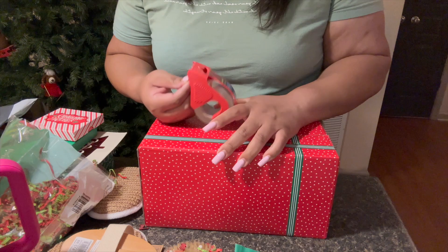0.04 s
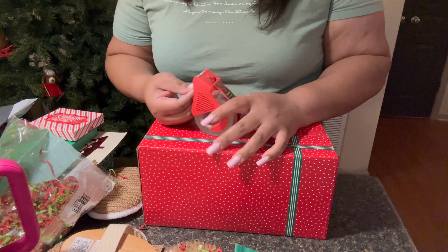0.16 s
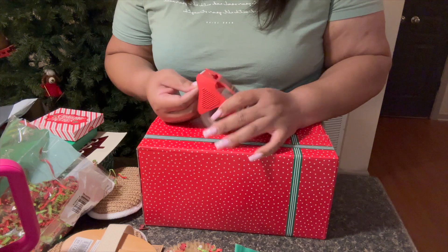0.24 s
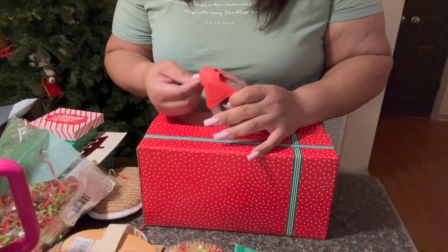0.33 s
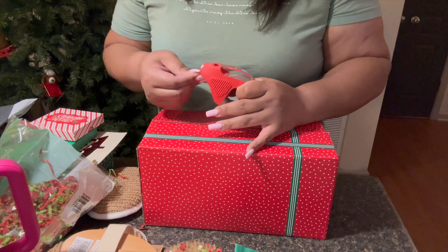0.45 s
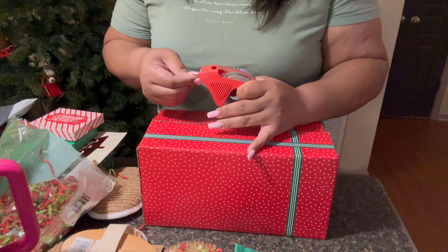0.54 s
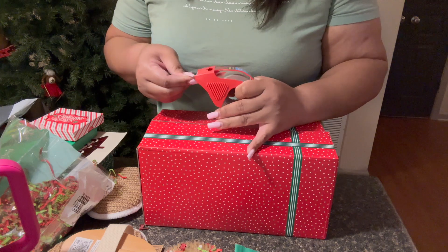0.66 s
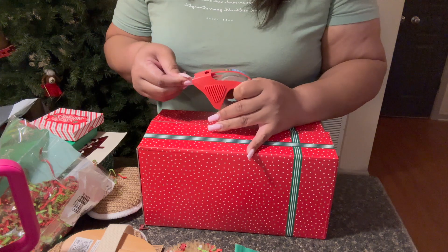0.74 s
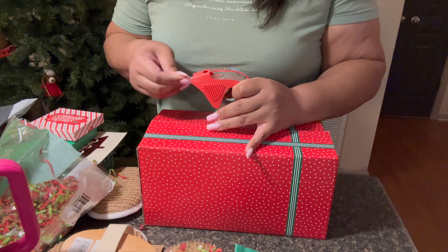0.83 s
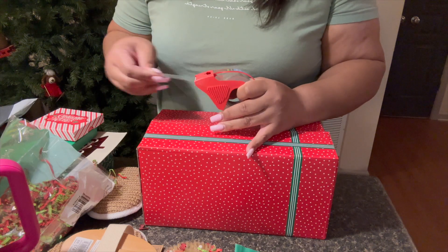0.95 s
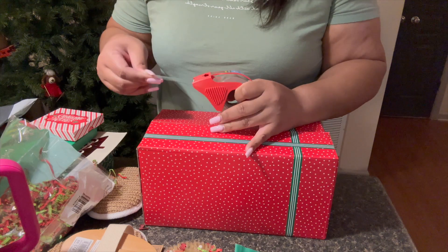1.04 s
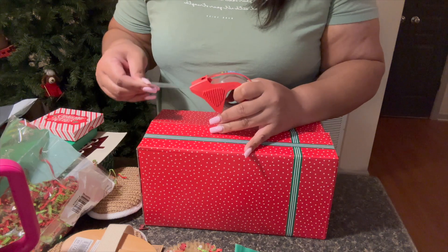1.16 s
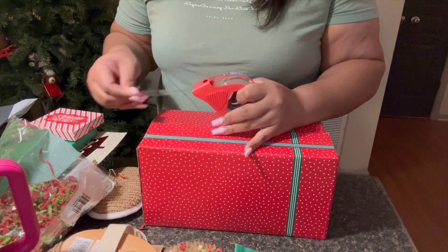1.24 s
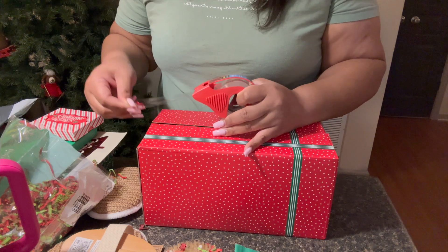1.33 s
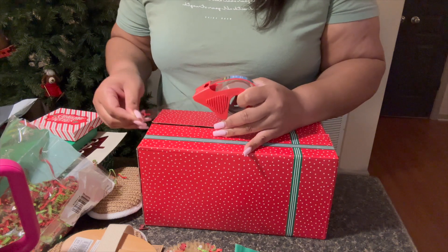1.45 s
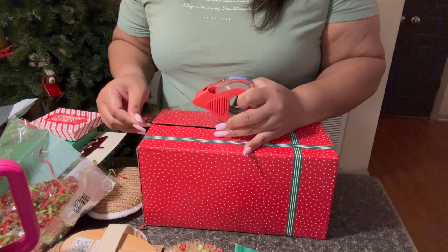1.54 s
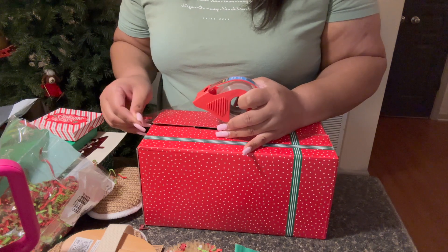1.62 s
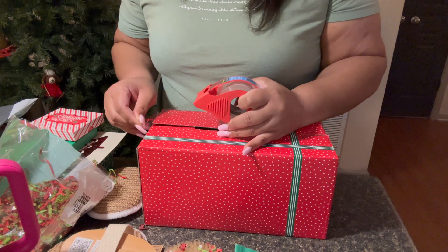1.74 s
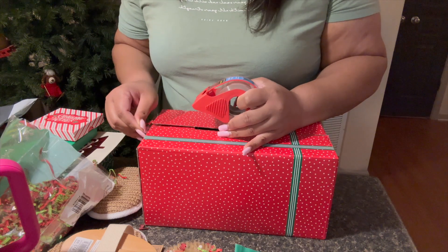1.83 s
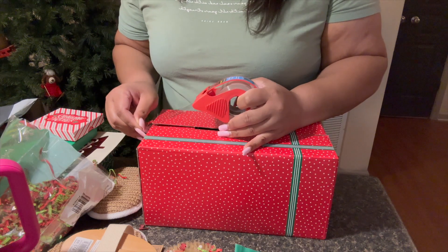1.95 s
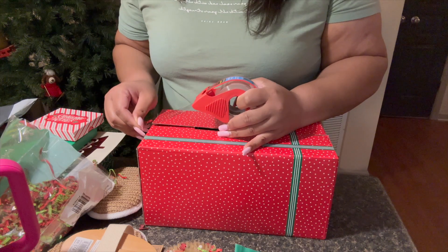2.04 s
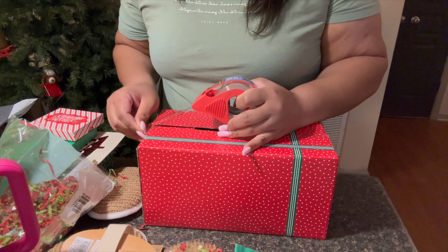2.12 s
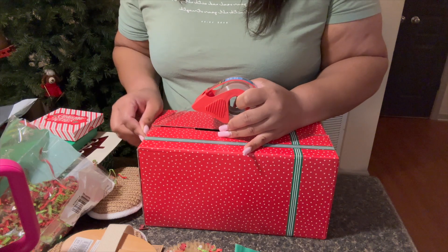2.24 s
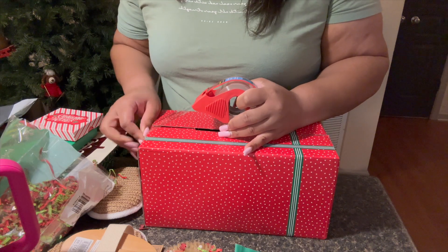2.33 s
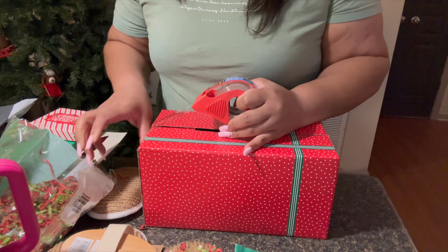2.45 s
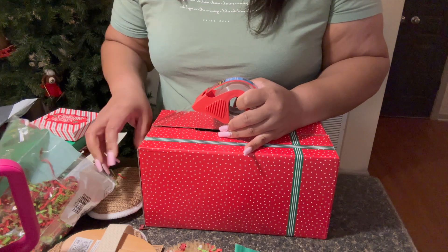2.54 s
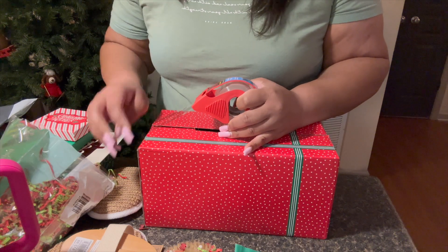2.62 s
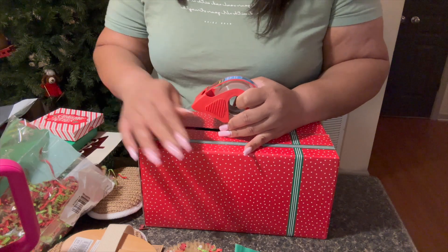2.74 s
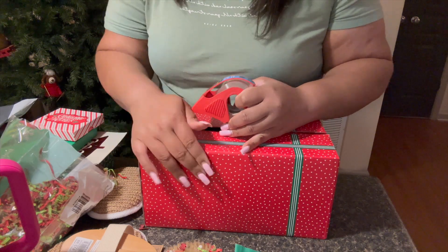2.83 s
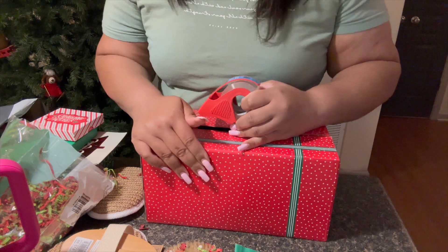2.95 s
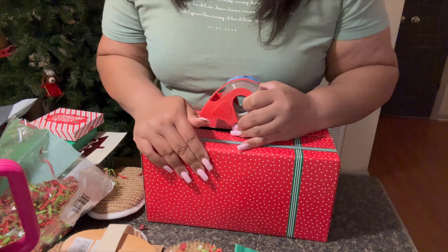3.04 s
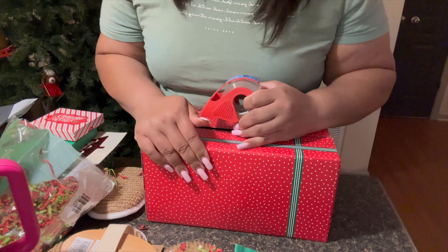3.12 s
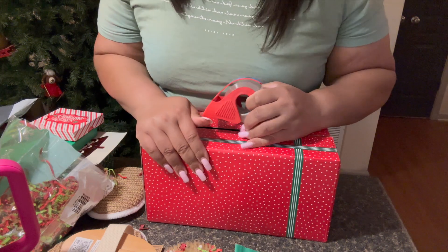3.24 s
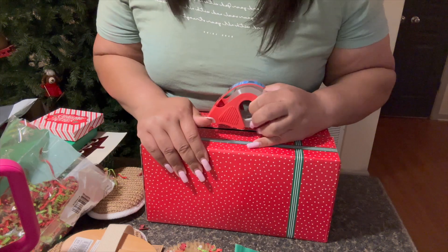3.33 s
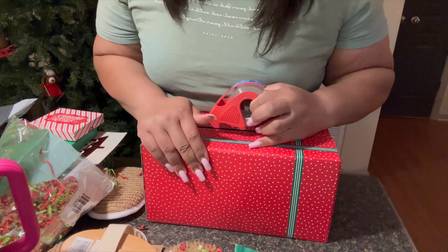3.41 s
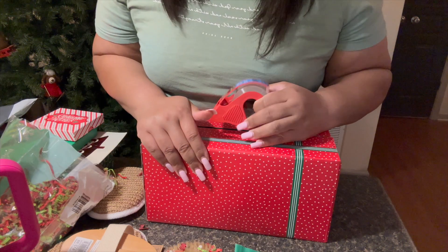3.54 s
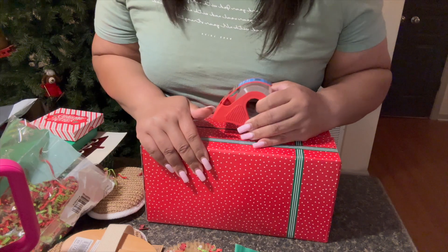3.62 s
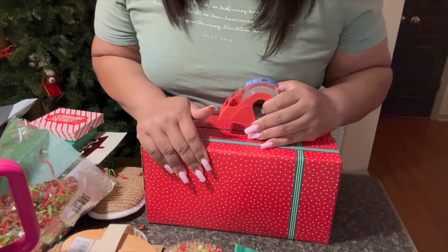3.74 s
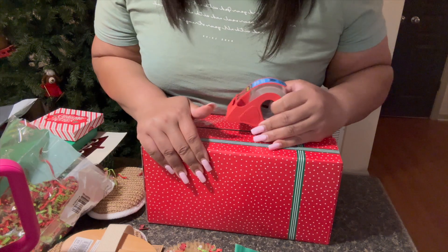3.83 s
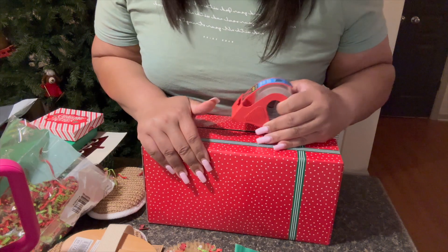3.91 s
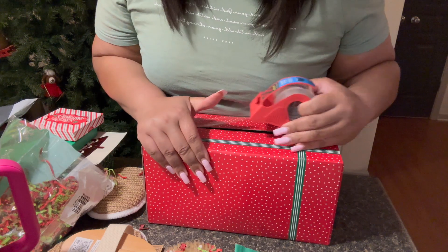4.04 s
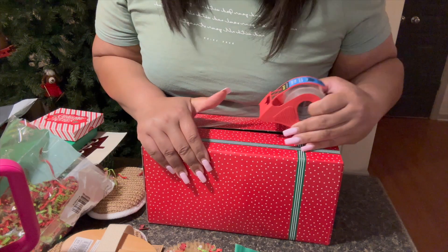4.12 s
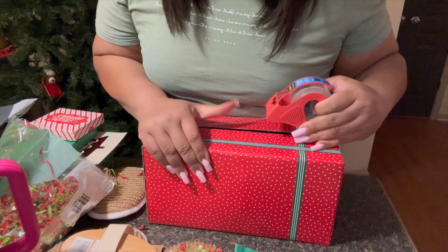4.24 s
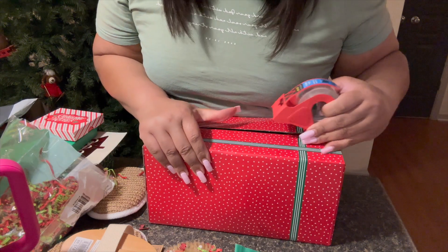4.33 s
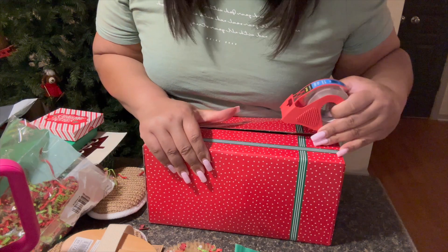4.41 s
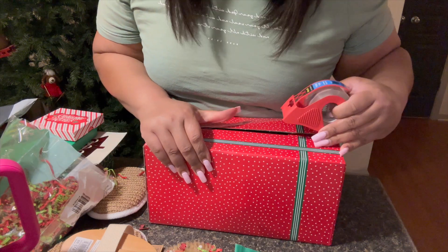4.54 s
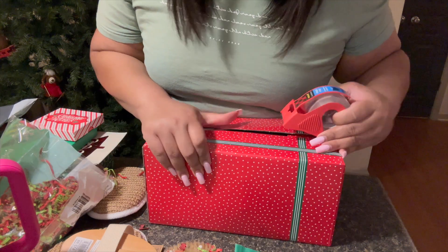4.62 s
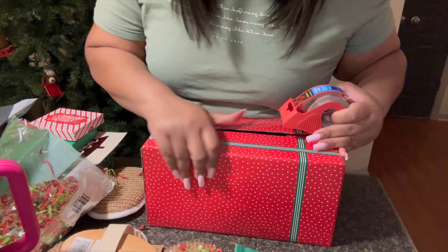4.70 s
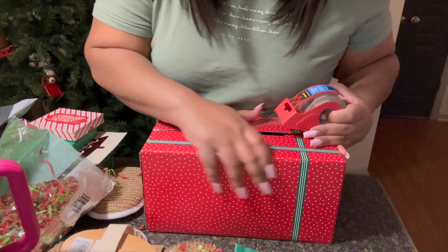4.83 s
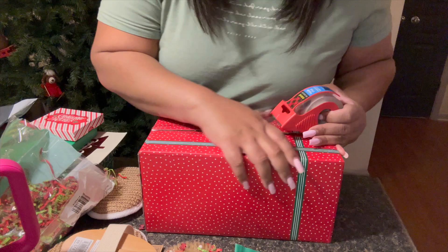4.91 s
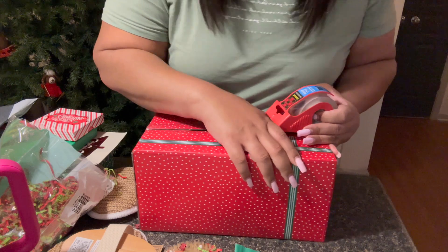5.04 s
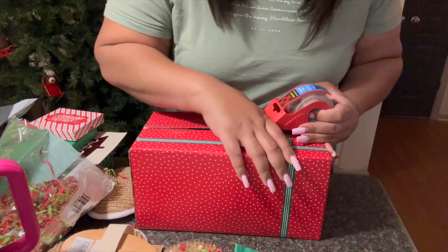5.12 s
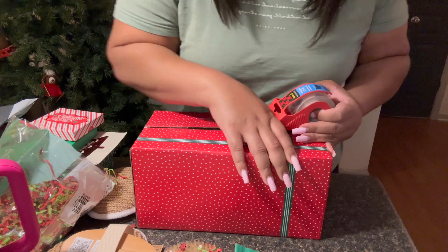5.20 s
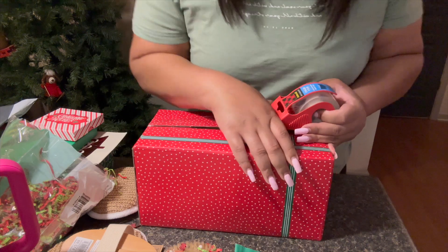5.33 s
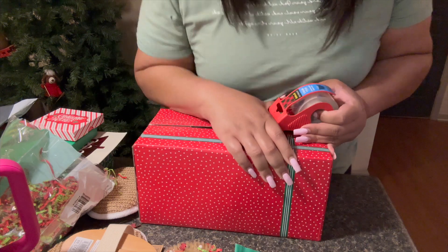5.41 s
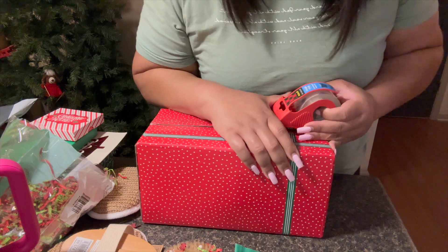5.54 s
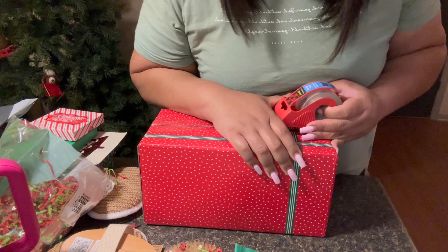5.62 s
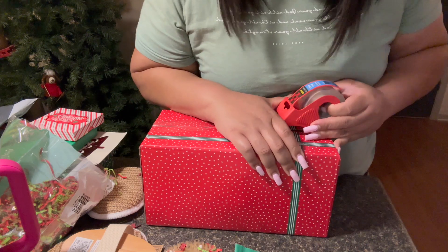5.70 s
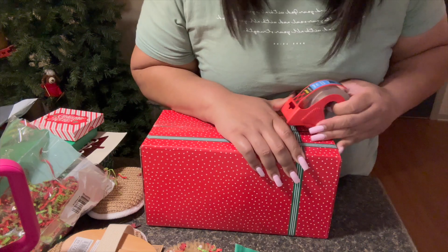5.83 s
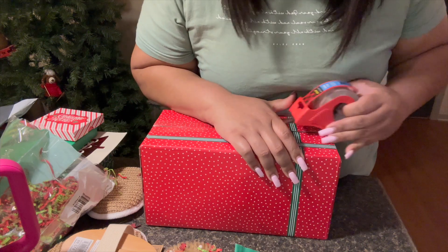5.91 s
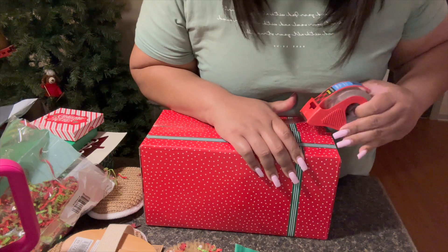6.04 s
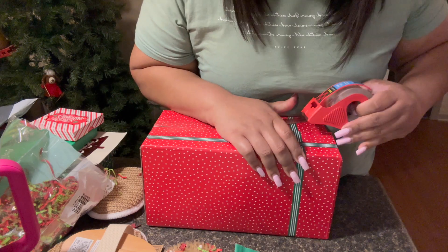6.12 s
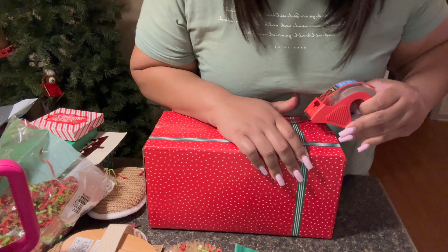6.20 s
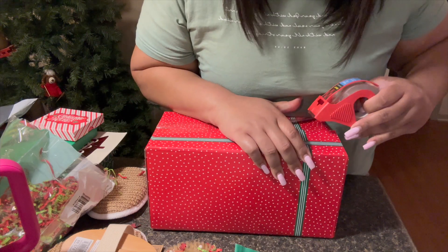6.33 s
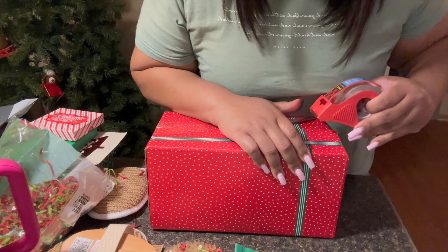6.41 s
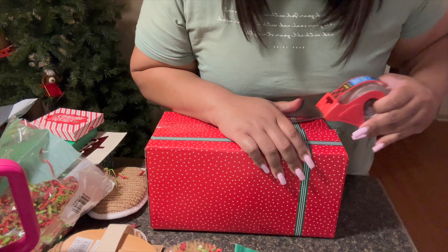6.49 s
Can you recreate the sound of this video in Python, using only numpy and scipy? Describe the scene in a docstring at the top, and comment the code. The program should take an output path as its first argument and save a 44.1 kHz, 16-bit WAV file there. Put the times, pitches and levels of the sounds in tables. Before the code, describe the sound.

Close, harsh bursts of tape peeling stutter and rattle from a small dispenser, separated by paper rubs, light ticks and dull box taps indoors.

```python
"""A low hush and a hand rubbing paper come first, with small ticks and soft knocks on a wrapped cardboard box.
Then sticky tape jerks off a handheld plastic dispenser in rattling pulls: each slip of the glue is a short
noise burst that rings damped modes of the dispenser shell, the lid panels and the box walls.
Fine crackle fills parts of the pulls, hands brush and knock between them, and echoes of a hard kitchen
answer. Two microphone ports hear it all."""
import sys
import numpy as np
from scipy import signal
from scipy.fft import rfft, irfft, next_fast_len
from scipy.io import wavfile
from scipy.ndimage import uniform_filter1d

SR = 44100
rng = np.random.default_rng(int(sys.argv[2]) if len(sys.argv) > 2 else 0)


def digitize_waveform(pressure):
    """Quantize a signal to 16-bit integers and store it at the path in sys.argv[1].

    Rows of a 2-D input are taken as channels; values are limited to [-1, 1].
    """
    field = np.atleast_2d(pressure).T
    bounded = np.clip(field, -1, 1)
    quanta = np.round(bounded * 32767).astype(np.int16)
    wavfile.write(sys.argv[1], SR, quanta)


N = 289418

# Colour of the low background hush: f/Hz, relative level/dB
HUSH_COLOUR = [(25, -25.5), (52, -11), (82, -21.5), (118, -12.5), (160, -27), (300, -25), (800, -39.5),
               (3000, -54.5), (16000, -78)]
HUSH_DB = -61.5  # before the blend of shared and separate noise

# Strokes of a hand on paper: t/s, length/s, hiss level/dB, muffled rub level/dB (before shape and trims)
HAND_STROKES = [(-.1, 0.46, -45, -48), (1.732, 0.22, -88, -50.5), (2.118, 0.23, -84, -34.5),
                (2.34, 0.23, -55, -30), (2.737, 0.29, -51.5, -38.5), (2.92, 0.75, -73, -44.5),
                (4.584, 0.13, -63, -49.5), (4.634, 0.59, -48.5, -50.5), (5.048, 0.31, -64, -58.5),
                (5.303, 0.34, -57, -43), (5.54, 0.1, -57.5, -43.5), (6.162, 0.094, -66.5, -33.5)]
# Colours of the brushing hiss and of the muffled rub: f/Hz, relative level/dB
BRUSH_COLOUR = [(300, -11), (900, 2.5), (2500, -4), (5200, 0), (8000, 8), (12000, -5.5), (14600, 2),
                (16000, -30.5)]
MUFFLED_COLOUR = [(40, -15), (110, -13), (250, -4), (420, -9), (800, -17), (2000, -37)]
STROKE_RISE = 0.19  # share of the stroke spent rising

# Small ticks of tape and paper: t/s, crack level/dB, sizzle level/dB, shell level/dB # (the last two relative
# to the crack; the shell before its trim). The row at 2.3573 s is no separate tick: # it gives the glue slip at
# 2.358 s an extra bright, sizzling edge
TAPE_TICKS = [(0.1002, -33, -8, -12), (0.176, -35, -14, -10.5), (0.207, -68, -9, -17),
              (0.2312, -24, -9, -16), (0.265, -34.5, 2, -29), (0.283, -43, 6.5, -27), (0.297, -49, 0, -18),
              (0.325, -31, 3.5, -21), (0.343, -29, 12.5, -6), (0.363, -26.5, 1.5, -11.5),
              (0.406, -36, 5, -22), (0.4138, -23, -3.5, -18), (1.777, -53, 2, -19), (1.807, -42, 0, -29),
              (1.812, -34, -3, -30), (2.1055, -52.5, -28.5, -2), (2.168, -35, -1, -10),
              (2.192, -38, -3, -17), (2.317, -42, 8.5, -25), (2.3573, -23.5, 10, -24), (2.47, -38, -6, -31),
              (2.489, -32.5, -1, -11.5), (2.5227, -36, 1, -34), (2.6803, -49, -9.5, -34),
              (2.791, -36.5, -7, -7), (2.8022, -28.5, -2.5, -14), (2.955, -44.5, 0, -5),
              (3.011, -30.5, -9, -14), (3.1164, -45, -2, -5), (3.1962, -30, -26, -5),
              (4.657, -57.5, 17.5, 6.5), (4.859, -37, 5, -31), (4.8684, -25.5, -4, -34),
              (4.9125, -39.5, 7, -14), (4.991, -36, 3, -41), (5.1363, -33, 14.5, -18),
              (5.1756, -36, 4, -28), (5.222, -55, -9, -13), (5.288, -43, -2, -24),
              (5.3612, -23.5, -16, -16), (5.388, -30.5, -12, -28), (6.442, -21, -5, -18)]
TICK_MS, TICK_SHELL_HZ = 1.4, 1478
# Slips of the glue: t/s, peak level/dB, slip length/ms, liveliest shell mode f/Hz, sizzle level/dB,
# liveliest panel f/Hz, panel level/dB (sizzle and panels relative to the crack, before random scatter)
GLUE_SLIPS = [(0.3496, -26.5, 2.6, 4120.0, 8, 380.0, -20), (0.4248, -15, 2.8, 1520, 5, 1000.0, -27.0),
              (0.4397, -13.5, 3.4, 1300, 1.5, 1020, -30), (0.503, -10, 3.9, 4170, 2.5, 420, -32),
              (0.5804, -8, 3.4, 1810, 1.5, 420.0, -31), (0.6551, -8, 1.7, 1670, 1.5, 407, -27.5),
              (0.7078, -2, 1.9, 1580, -3.5, 394, -34), (0.7234, -10.0, 3.6, 1500, -3.5, 860, -20),
              (0.858, -10, 1.6, 4490.0, 5.5, 402, -29), (0.8642, -15.5, 3.7, 2860.0, -8.5, 860.0, -11.5),
              (0.8866, -9, 3.8, 2240.0, -1.5, 580, -19), (0.8964, -4.5, 2.9, 3840.0, -5.5, 573, -23.5),
              (0.913, -3, 2.5, 1510.0, -9.5, 403, -29), (0.9197, -9, 5.1, 1450, 1.5, 420.0, -21),
              (0.931, -11.5, 3.5, 1460, -9, 412, -16), (0.9377, -12, 4.7, 1720, -1, 560, -13),
              (0.9465, -5.5, 3, 1670, -2.5, 396, -22.5), (0.9512, -9.5, 2.7, 1510, 0.5, 420, -17),
              (0.9676, -13, 5.2, 1380, 1.5, 870, -27), (1.1771, -9, 2, 2670, 3.5, 392, -30),
              (1.1819, -15, 3.2, 3620, -5, 423, -15.5), (1.188, -17.5, 4.0, 3600, -14, 790.0, -7.5),
              (1.2135, -5.5, 2.4, 1640.0, -3, 405, -19), (1.2299, -9.0, 2.3, 1480.0, 0.5, 425, -12),
              (1.2339, -13, 4.3, 1510, -3.5, 433, -8), (1.2481, -4.5, 1.6, 3150, 1.5, 375, -20.0),
              (1.257, -6, 3, 1524, -4, 442, -13.5), (2.358, -22.5, 1.3, 4770.0, -2, 269, -17.0),
              (3.0057, -17.5, 2.05, 5050, 7, 302, -19.5), (3.2004, -9.5, 2.9, 3730, 0.5, 440.0, -20.5),
              (3.2172, -9, 1.7, 3880, -1.5, 410.0, -21.0), (3.2442, -13.5, 2, 1430, 1.5, 257, -10.5),
              (3.5018, -2.5, 1.78, 1070, 0.0, 270, -21.5), (3.5882, -9.5, 2.5, 1170, -4, 287, -11),
              (3.597, -0.5, 1.9, 1554, -18, 435, -19), (3.6226, -8.0, 3.1, 1100.0, -5.5, 960, -11.5),
              (3.6377, -6.5, 2.6, 1150, -8.0, 426, -10.5), (3.682, -7, 2.8, 1300, -3.5, 920, -15),
              (3.7477, -6, 2.4, 1590, -2.5, 433, -15), (3.7687, -7.0, 1.45, 1550, -6, 318, -10),
              (3.7853, -8, 2.3, 1645, 0, 740, -11), (3.793, -5, 2.7, 4230, -12.5, 322, -27),
              (3.8323, -17, 1.8, 2400, 3, 454, -27), (3.8692, -6, 1.5, 4020, -5.5, 420, -16.5),
              (3.897, -9, 2.9, 2500, -7, 974, -12), (3.906, -4.5, 1.6, 3290, -8, 933, -12.5),
              (3.9309, -4, 2.3, 3190, -10, 956, -15), (3.9415, -5.5, 1.8, 2470, -4, 730, -11.5),
              (3.9582, -10, 4, 3440, -6, 940, -29), (3.963, -8.5, 2.9, 2630, -9, 670, -13),
              (3.9724, -9, 2.5, 2350.0, -5, 270.0, -18.0), (3.9821, -2.5, 2.9, 4050, -11, 940.0, -17),
              (3.9877, -10.5, 2.6, 1580.0, -1, 670.0, -17.0), (3.9948, -3, 3.8, 2520.0, -14, 946, -15.5),
              (4.0063, -6.5, 2.6, 2560.0, -2.5, 975, -10), (4.0174, -5, 2.2, 2500, -11, 640, -14.5),
              (4.022, -3, 1.6, 2700, -11, 750, -28), (4.035, -7, 2.7, 1600, -6, 920, -13),
              (4.04, -10, 2.9, 1550, -8, 930, -26), (4.0514, -4.0, 2.1, 3080, -3, 960, -13),
              (4.0603, -3, 2, 2500, -16, 290.0, -14), (4.0744, -8.5, 0.96, 2470, -5, 950, -13),
              (4.0938, -4.5, 4.7, 2770, -7, 960, -24), (4.1049, -8.5, 1.2, 1440, -4, 904, -24),
              (4.1395, -9, 2.6, 1570, -0.5, 443, -15), (4.191, -4.5, 2.6, 2430, -5, 259, -14.5),
              (4.2647, -5.5, 2.6, 2570, -4, 1036, -20.5), (4.315, -0.5, 1.66, 2910.0, -5, 290.0, -21.5),
              (4.336, -7.5, 2.2, 4440, 0, 322, -18), (4.3453, -1, 2.5, 2600, -9, 378, -18),
              (4.3596, -8.0, 1.7, 2480, -1.0, 396.6, -16), (4.372, -7.0, 1.9, 1390, -1, 270.0, -21),
              (4.3909, -8, 1.44, 3030, -0.5, 400, -24), (5.1392, -23.0, 1.86, 1160, 6, 905, -20),
              (5.4641, -9.5, 2.5, 3970, 1.5, 703.6, -18), (5.6657, -10, 3.4, 1290.0, -4.5, 300.0, -22.5),
              (5.7338, -2.5, 1.5, 1360, -7.0, 328, -23), (5.798, -8.5, 2.4, 1330, -2.5, 520.0, -14.5),
              (5.8197, -5.5, 2.6, 1400, -9, 520, -16), (5.8314, -10, 2.5, 1655, -1, 370, -22),
              (5.8442, -3, 2.3, 1440, -7.0, 517, -18.5), (5.8487, -1, 3.4, 2100, -21, 503, -21),
              (5.8633, -8.5, 2.9, 3140, -1, 440, -22), (5.8677, -12, 2.7, 1430, -8, 392, -14.0),
              (5.8778, -7.5, 2.2, 2820, -6.0, 780.0, -13), (5.8883, -6, 2.4, 1306, -2, 850, -26),
              (5.9012, -10.5, 2.6, 1260, -2, 685, -9), (5.9069, -13.5, 1.8, 4400, -1, 614, -24),
              (5.9099, -10.5, 2.2, 2270, -3.0, 509, -22), (5.9234, -4.5, 2.6, 4730, -8, 395, -22),
              (5.932, -5, 1.9, 4540, -1.5, 354, -18), (5.9462, -12, 1.3, 2830, 0, 740.0, -13),
              (5.9621, -7.5, 3.6, 2720, -3, 402, -15.0), (5.9852, -6, 1.4, 2650, -2, 880, -19),
              (5.9979, -15.5, 2.3, 2660, -23, 436, -11.5), (6.0293, -9.0, 2.9, 2800, -3.5, 900, -14.5),
              (6.2785, -4.5, 1.7, 4820, -1.5, 976, -13.5), (6.339, -10, 3.0, 4420, 1.5, 400, -15),
              (6.4294, -12, 2.0, 2730, 2.5, 860, -8.5), (6.4776, -14, 3.2, 2600, 3.5, 970, -22.0),
              (6.4872, -7, 1.4, 4300, 0, 615, -12), (6.5078, -11, 4.2, 3500, -5.5, 420, -22),
              (6.5211, -8, 3.7, 1870, -2.5, 750.0, -21.0), (6.542, -8.5, 2.5, 3330, -2, 384, -15)]
# How dispenser and hands rest on the lid from each moment on: t/s, shell level/dB,
# favoured box mode f/Hz, box level/dB (levels relative to the crack, before scatter and trims)
HAND_GRIPS = [(.3, -14, 119.6, -51.5), (.5, -26, 116.6, -55), (.88, -16.5, 121.3, -53),
              (1.1, -13.5, 119.5, -46.5), (1.2, -17, 122.4, -56.5), (2.3, -20, 120, -7.5),
              (2.9, -23, 116, -37), (3.1, -16.5, 119, -23), (3.4, -11.5, 126.7, -16),
              (3.55, -15.5, 152, -20), (3.66, -16, 128.6, -19), (3.76, -12.5, 142, -19.5),
              (3.85, -10.5, 129, -19.5), (3.92, -10, 155.7, -24), (4.05, -9.5, 149, -20),
              (4.17, -6, 148, -17.5), (4.3, -11.5, 155, -26), (5.1, -8.5, 125, -18), (5.4, -14, 117, -30.5),
              (5.6, -14.5, 119, -38), (5.83, -12.5, 117.8, -55.5), (5.93, -10, 116, -36),
              (6.2, -14, 113.8, -23.5), (6.4, -18, 114.4, -16.5), (6.47, -10.5, 124, -29.5)]
# Colours of the crack and of its sizzle: f/Hz, relative level/dB
CRACK_COLOUR = [(700, -18), (1400, -8), (2100, -3), (3000, -3.5), (4300, -3.5), (5600, -6.5), (7000, -1),
                (8300, -12), (9300, -42.5)]
SIZZLE_COLOUR = [(6500, -16.5), (8700, 2.5), (10500, 0), (13500, 1), (15500, 1.5), (16500, -23)]
# The part of a crack that differs between the ports: f/Hz, level/dB
PORT_DIFFERENCE = [(800, -16.5), (2000, -8), (5000, 4), (8000, -6), (11000, -2.5), (16000, -21)]
# Ringing modes of dispenser shell, lid panels and box: f/Hz, relative level/dB, time to fall 60 dB/s
SHELL_MODES = [(1026, 8, 0.015), (1243, -2.5, 0.023), (1417, -9, 0.036), (1558, -0.5, 0.025),
               (1776, -13, 0.059), (1790, -13, 0.0054), (2362, -2, 0.019), (2570, -10.5, 0.027),
               (2815, -6, 0.024), (3375, -5, 0.0081), (3910, -6, 0.026), (4560, -8.5, 0.034),
               (5060, -14.5, .007)]
PANEL_MODES = [(254.3, 8, 0.053), (305, 8, 0.033), (373.3, 4, 0.038), (418, 4.5, 0.064), (480.8, -4, 0.033),
               (544.8, 0, 0.04), (645, -0.5, 0.046), (742, -0.5, 0.046), (852, -6.5, 0.035),
               (942, -0.5, 0.05)]
BOX_MODES = [(52, -14, .1), (72, -5, .12), (98, -1, 0.1), (121.3, -1, 0.2), (153.1, 1.5, 0.22),
             (173, -2, .18), (205, -8, 0.1)]
SIZZLE_SCATTER_DB, RING_SCATTER_DB = 1.64, 2.53  # random spread from slip to slip
CREST_DB = 4  # a slip's peak above its mean strength
SLIP_RISE_MS = 0.15
FIRST_BREAK, FIRST_BREAK_MS = 0.78, 0.13  # extra height and length of the first strands' break
SHELL_TRIM_DB = 2  # added to the shell levels of grips and ticks
SHELL_TO_WALLS_DB = -7  # the hand shields the shell's ring from the walls
PRESSED_RING = 0.5  # share of the box's and lid's ringing time left under the hands
BOX_LAG_S = 0.007  # the tug on the tape reaches the box walls a little after the crack
# Loss in dB per octave away from the liveliest mode
SHELL_FOCUS_DB, PANEL_FOCUS_DB, KNOCK_FOCUS_DB, PRESSED_FOCUS_DB = 28, 25.5, 71, 6

# Fingers and dispenser bump the box: t/s, panel level/dB, liveliest panel f/Hz,
# box level/dB relative to the panels (levels before small trims)
BOX_KNOCKS = [(0.103, -22.5, 415, -2.5), (0.233, -24.5, 250, -8), (1.137, -36, 250, -6),
              (1.161, -34, 278.5, -7.5), (1.539, -41.5, 260, 0), (1.756, -47, 306, -26),
              (1.789, -46.5, 342.4, -4), (1.825, -45.5, 419, 3), (2.108, -34, 380, -11),
              (2.109, -36, 542, -22), (2.125, -33, 396, -12), (2.17, -23.5, 378, -5),
              (2.186, -46.5, 304, 13.5), (2.488, -39.5, 504, -10), (2.698, -71, 255, 27.5),
              (2.791, -33, 247, 6.5), (2.802, -29, 250, 2), (2.822, -47.5, 254, 0), (2.85, -44, 370, 13),
              (3.128, -39, 373, 2.5), (4.624, -45.5, 245, 3), (4.731, -44, 341, -1.5),
              (4.868, -45.5, 486, -20), (4.899, -51, 310, -10), (4.91, -41.5, 924, -2), (5.14, -39, 889, 3),
              (5.182, -41, 281, -2), (5.223, -45, 586, -17), (5.466, -21.5, 774, -18), (5.8, -56, 300, 22),
              (6.057, -49.5, 305, 11), (6.19, -53, 300, 7)]

# Stretches of fine tape crackle: t/s, length/s, level/dB
CRACKLE_STRETCHES = [(0.841, .13, -22), (1.157, 0.13, -26), (3.596, 0.073, -26), (3.744, 0.066, -32),
                     (3.904, 0.2, -23.5), (4.305, 0.066, -38), (5.85, 0.146, -28), (6.285, 0.18, -29.5),
                     (6.458, 0.081, -22.5)]
# Colour of that crackle: f/Hz, relative level/dB
CRACKLE_COLOUR = [(500, -19.5), (1200, -2), (2000, -2), (2800, 4.5), (3600, -0.5), (5500, -1.5),
                  (8300, -2.5), (13000, -17), (16500, -30)]
CRACKLES_PER_S, CRACKLE_SPREAD_DB, CRACKLE_EDGE_S = 1300, 0.5, 0.023

# First bounces from lid and hands: delay/ms, level/dB
FIRST_BOUNCES = [(.62, -14), (2.3, -16)]
# How long the kitchen rings: f/Hz, time to fall 60 dB/s
ROOM_DECAY = [(100, 1), (260, 0.23), (700, 0.59), (1840, 0.53), (4850, 0.54), (12800, 0.42)]
# How loud the kitchen answers: f/Hz, level/dB against the direct sound
ROOM_LEVEL = [(100, -11.5), (400, 4), (700, 6.5), (1500, 2.5), (2700, 0.5), (5000, -1.5), (12000, -10)]
# How alike the kitchen sounds at both ports: f/Hz, likeness (0 to 1)
ROOM_LIKENESS = [(100, 0.28), (300, 0.68), (700, 0.52), (3000, 0.024), (7000, 0.48), (11000, 1), (15000, 1)]

# By how much the left port leads the right: f/Hz, phase/rad
PORT_LEAD = [(340, 0), (600, -.8), (1460, .3), (4480, .6), (6000, -2.4), (8960, -3.8), (11500, -6.0),
             (13000, -6.3)]
# Left level minus right level: f/Hz, level/dB
PORT_LEAN = [(60, 4.5), (150, 3), (380, 4), (950, 2.5), (2380, 1), (5980, -1), (15000, -0.5)]
# Response shared by the ports: f/Hz, level/dB
MIC_RESPONSE = [(20, -15.5), (60, -5), (110, -3.5), (16000, -4.5)]
EDGE_HZ = 16300  # upper band limit


def gain_of(db):
    """Turns decibels into a factor."""
    return 10 ** (np.asarray(db) / 20)


def evened(x):
    """Scales to an rms of 1."""
    return x / np.sqrt(np.mean(x ** 2) + 1e-20)


def read(points, hz):
    """Reads a table between its points on a log-frequency axis."""
    f, value = np.transpose(points)
    return np.interp(np.log(hz + 1), np.log(f + 1), value)


def add(mix, s, sound):
    """Mixes a sound in at s seconds."""
    part = mix[round(s * SR):][:len(sound)]
    part += sound[:len(part)]


def filtered(x, response):
    """Multiplies the spectrum by a function of frequency."""
    size = next_fast_len(N)
    hz = np.fft.rfftfreq(size, 1 / SR)
    return irfft(rfft(x, size) * response(hz), size)[..., :N]


def coloured(x, points):
    """Shapes the spectrum, keeping the power of white noise."""
    return filtered(x, lambda hz: evened(gain_of(read(points, hz))))


def hush():
    """Low steady noise, mostly shared by the ports, with a little of its own in each."""
    common, left, right = coloured(rng.standard_normal((3, N)), HUSH_COLOUR)
    return gain_of(HUSH_DB) * (1.9 * common + .3 * np.array([left, right]))


def hands():
    """Skin slides on paper: a slightly grainy hiss and a lumpy low rub swell and ease with each stroke."""
    t = np.arange(N) / SR
    level = np.zeros((2, N))
    for s, length, *levels_db in HAND_STROKES:
        # the first value also holds as a faint trace before the stroke
        shape = np.interp(t - s, [0, STROKE_RISE * length, length], [0.0036, 0.76, 0])
        level += shape * gain_of(levels_db)[:, None]
    hiss, rub, grain, lumps = rng.standard_normal((4, N))
    grain = evened(uniform_filter1d(grain, 100))
    lumps = evened(uniform_filter1d(lumps, 900))
    hiss = coloured(hiss * gain_of(0.76 * grain), BRUSH_COLOUR)
    rub = coloured(rub * gain_of(8.4 * lumps - 5.5), MUFFLED_COLOUR)
    return gain_of(6.0) * level[0] * hiss + level[1] * rub


def slip(ms):
    """Two ragged bursts of one shape: glue strands break fast at first, then the slip dies."""
    t = np.arange(500) / SR * 1000  # ms
    ragged = gain_of(2.2 * np.repeat(rng.standard_normal(50), 10))
    shape = np.minimum(t / SLIP_RISE_MS, 1)
    shape *= np.exp(-.8 * t / ms) * np.exp(-(t / (1.7 * ms)) ** 4)
    shape *= 1 + FIRST_BREAK * np.exp(-t / FIRST_BREAK_MS)
    bursts = rng.standard_normal((2, 500)) * ragged * shape
    # both bursts get the energy of the smooth shape
    return bursts * np.linalg.norm(shape) / np.linalg.norm(bursts, axis=1)[:, None]


def ring(modes, push, scatter_db, rise_ms, lively_hz=None, damp_db=60):
    """Damped modes driven by a short push; each blow finds them in a new mix."""
    hz, db, t60 = np.transpose(modes)[:, :, None]
    chance = rng.standard_normal((3, len(modes), 1))
    t = np.arange(int(t60.max() * SR)) / SR
    db = db + scatter_db * chance[0]
    if lively_hz:  # the grip tunes all modes so that the nearest has this pitch, and damps the others
        hz = hz * lively_hz / hz[np.argmin(abs(np.log(hz / lively_hz)))]
        db = db - np.minimum(damp_db * abs(np.log2(hz / lively_hz)), 20)
    # the blow reaches each mode at its own moment
    turns = hz * (1 + .012 * chance[1]) * t + chance[2]
    swing = gain_of(db - 60 * t / t60) * np.sin(2 * np.pi * turns) / hz
    swing *= 1 - np.exp(-1000 * t / rise_ms)
    out = np.diff(signal.fftconvolve(swing.sum(0), push))  # air follows the speed of the surface
    return out / np.sqrt(np.mean(out[:500] ** 2))


def add_crack(crack, sizzle, shell, s, db, sizzle_db, ms, shell_hz, shell_db):
    """One slip bursts into crack and sizzle and sets the dispenser shell ringing."""
    direct, difference = slip(np.clip(ms, .5, 8))
    # summed over all directions the crack has an even spectrum: a single click
    to_walls = np.array([np.linalg.norm(direct)])
    for k, part in enumerate((direct, difference, to_walls)):
        add(crack[k], s, gain_of(db) * part)
        add(sizzle[k], s, gain_of(db + sizzle_db) * part)
    shell_ring = ring(SHELL_MODES, np.hanning(7), 2, .3, shell_hz, SHELL_FOCUS_DB)
    add(shell, s, gain_of(db + shell_db + SHELL_TRIM_DB) * shell_ring)


def pressed(modes):
    """Hands resting on a surface shorten its ringing."""
    return [(hz, db, PRESSED_RING * t60) for hz, db, t60 in modes]


def tape():
    """Cracks of the glue (direct, port difference, spread to the walls) and all they set ringing."""
    crack, sizzle = np.zeros((2, 3, N))
    shell, rings = np.zeros((2, N))
    for s, db, sizzle_db, shell_db in TAPE_TICKS:
        add_crack(crack, sizzle, shell, s, db, sizzle_db, TICK_MS, TICK_SHELL_HZ, shell_db)
    lid, box = pressed(PANEL_MODES), pressed(BOX_MODES)
    grip_starts = np.transpose(HAND_GRIPS)[0]
    for s, db, ms, shell_hz, sizzle_db, panel_hz, panels_db in GLUE_SLIPS:
        _, shell_db, box_hz, box_db = HAND_GRIPS[np.searchsorted(grip_starts, s) - 1]
        chance = rng.standard_normal(4)
        db = db - CREST_DB
        sizzle_db = sizzle_db + SIZZLE_SCATTER_DB * chance[0]
        shell_db, panels_db, box_db = np.array([shell_db, panels_db, box_db]) + RING_SCATTER_DB * chance[1:]
        add_crack(crack, sizzle, shell, s, db, sizzle_db, ms, shell_hz, shell_db)
        panel_ring = ring(lid, np.hanning(16), 2.4, 1.5, panel_hz, PANEL_FOCUS_DB)
        add(rings, s, gain_of(db + panels_db) * panel_ring)
        thump = ring(box, np.hanning(120), 1.5, 3, box_hz, PRESSED_FOCUS_DB)
        add(rings, s + BOX_LAG_S, gain_of(db + box_db + 0.5) * thump)
    direct, difference, to_walls = coloured(crack, CRACK_COLOUR) + coloured(sizzle, SIZZLE_COLOUR)
    return direct, difference, to_walls, shell, rings


def knocks():
    """Soft, slower pushes ring mainly the low modes of lid and box."""
    out = np.zeros(N)
    for s, db, lively_hz, box_db in BOX_KNOCKS:
        panel_ring = ring(PANEL_MODES, np.hanning(60), 0.55, 0.47, lively_hz, KNOCK_FOCUS_DB)
        add(out, s, gain_of(db - 0.5) * panel_ring)
        add(out, s, gain_of(db + box_db - 5.0) * ring(BOX_MODES, np.hanning(150), 2.0, 0.6))
    return out


def crackle():
    """Many tiny strands part at random moments, each a short fading bit of noise."""
    t = np.arange(N) / SR
    level = np.zeros(N)
    for s, length, db in CRACKLE_STRETCHES:
        edges = np.minimum(t - s, s + length - t) / CRACKLE_EDGE_S
        level += gain_of(db) * np.clip(edges, 0, 1)
    size = gain_of(CRACKLE_SPREAD_DB * np.minimum(rng.exponential(1, N), 4))
    strands = size * (rng.random(N) < CRACKLES_PER_S / SR)
    fading = np.exp(-np.arange(100) / 25)
    strands = signal.oaconvolve(strands, fading)[:N] * rng.standard_normal(N)
    return level * coloured(evened(strands), CRACKLE_COLOUR)


def near(x):
    """Direct sound plus the first bounces off lid and hands."""
    taps = np.zeros(300)
    taps[0] = 1
    for ms, db in FIRST_BOUNCES:
        taps[round(ms * SR / 1000)] += gain_of(db)
    return signal.oaconvolve(x, taps / np.linalg.norm(taps))[:N]


def kitchen(x):
    """Dense tails dying band by band; three take turns so that like cracks get unlike echoes."""
    out = np.zeros((2, N))
    turn = np.arange(N) / SR * 37  # rad
    for k in range(3):
        noise = rng.standard_normal((2, 36000))
        hz, t, (left, other) = signal.stft(noise, SR, nperseg=256)
        same = np.clip(read(ROOM_LIKENESS, hz), 0, 1)[:, None]
        right = same * left + np.sqrt(1 - same ** 2) * other
        t60 = read(ROOM_DECAY, hz)[:, None]
        fall = gain_of(read(ROOM_LEVEL, hz)[:, None] - 60 * t / t60)
        fall /= np.sqrt(t60 * SR / np.log(1e6))  # long tails get no extra energy
        tail = signal.istft(np.array([left, right]) * fall, SR, nperseg=256)[1]
        # walls answer after some ms
        tail *= np.clip((np.arange(tail.shape[1]) / SR - .004) / 0.00016, 0, 1)
        share = np.sqrt(2 / 3) * np.cos(turn + k * np.pi / 3)
        out += signal.fftconvolve((share * x)[None], tail, axes=1)[:, :N]
    return out


def scene():
    """All sources in the kitchen over its low hush."""
    background = hush()
    handling = hands()
    crack, difference, to_walls, shell, rings = tape()
    handling = handling + knocks()
    fine = crackle()
    port_split = filtered(difference, lambda hz: gain_of(read(PORT_DIFFERENCE, hz))) * [[1], [-1]]
    # the lid faces the microphone more than the walls, so they get less of the handling
    sent = to_walls + gain_of(SHELL_TO_WALLS_DB) * shell + fine + rings + gain_of(-8.0) * handling
    direct = near(crack + shell + fine + rings + handling)
    return direct + port_split + kitchen(sent) + background


def record(dry):
    """The two ports differ in phase and level by frequency; soft overload; band limit."""
    side = np.array([[.5], [-.5]])  # left, right

    def port_response(hz):
        level = gain_of(read(MIC_RESPONSE, hz) + side * read(PORT_LEAN, hz))
        return level * np.exp(1j * side * read(PORT_LEAD, hz))

    ports = np.tanh(filtered(dry, port_response))
    low_pass = signal.firwin(255, EDGE_HZ, window=("kaiser", 9), fs=SR)
    return signal.oaconvolve(ports, low_pass[None], "same")


dry = scene()
out = record(dry)
digitize_waveform(out)
```